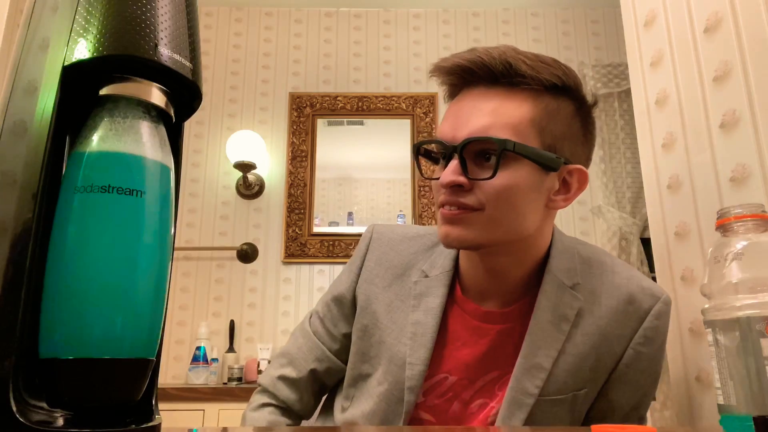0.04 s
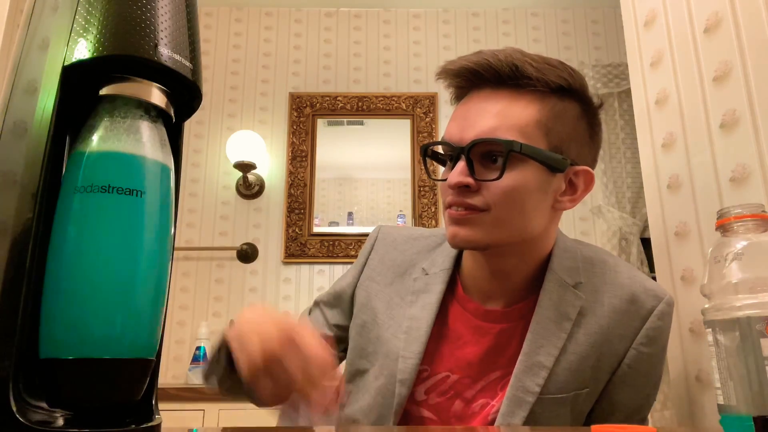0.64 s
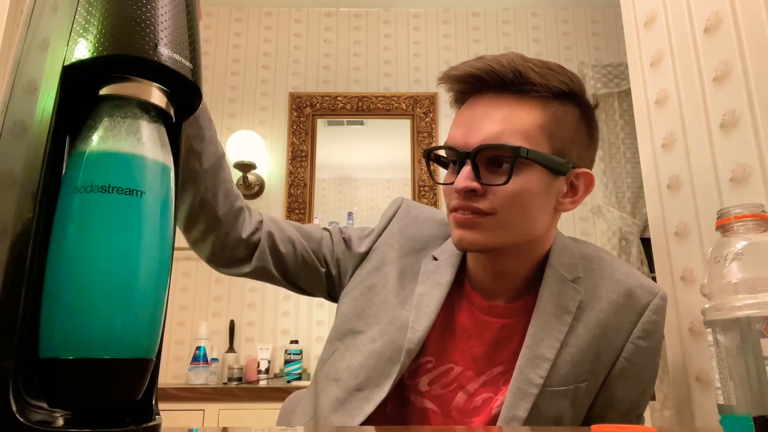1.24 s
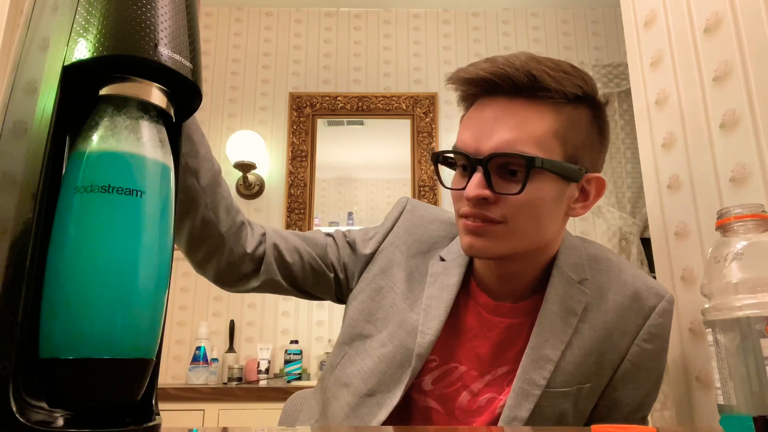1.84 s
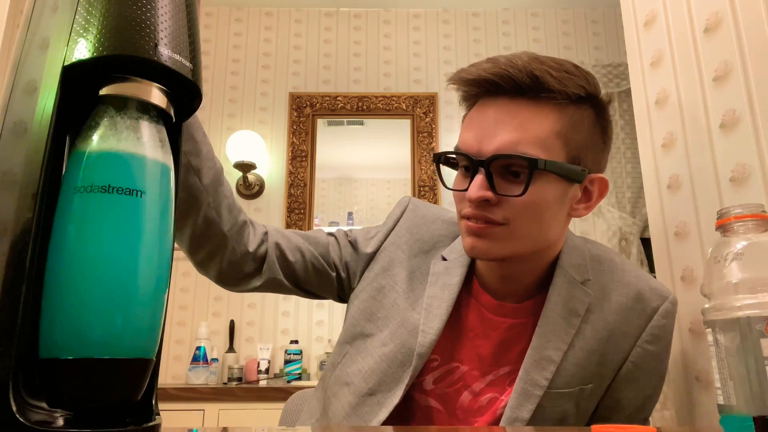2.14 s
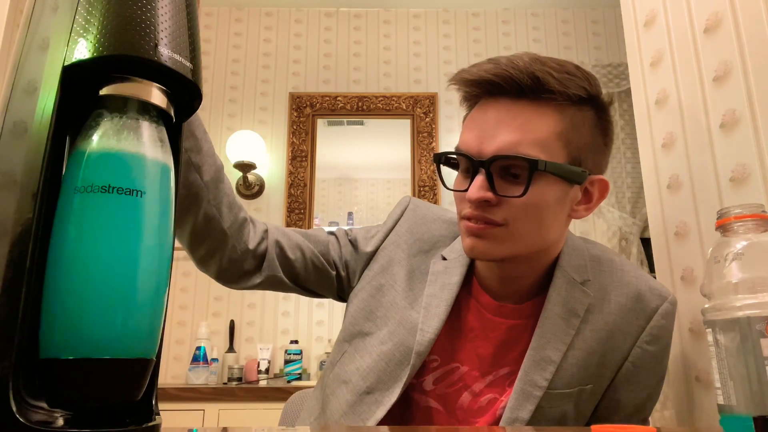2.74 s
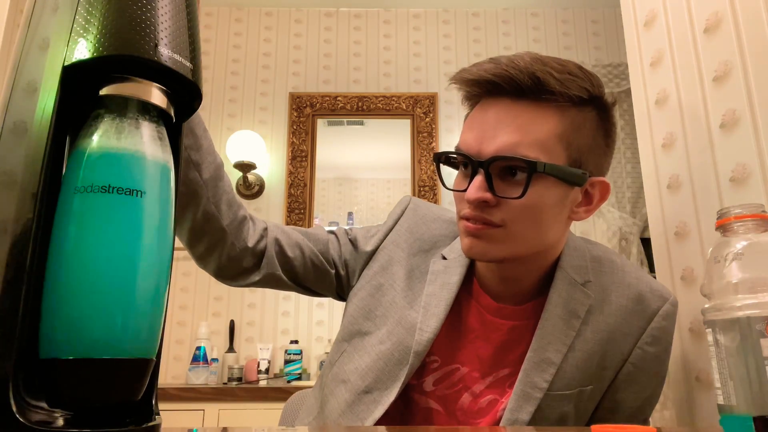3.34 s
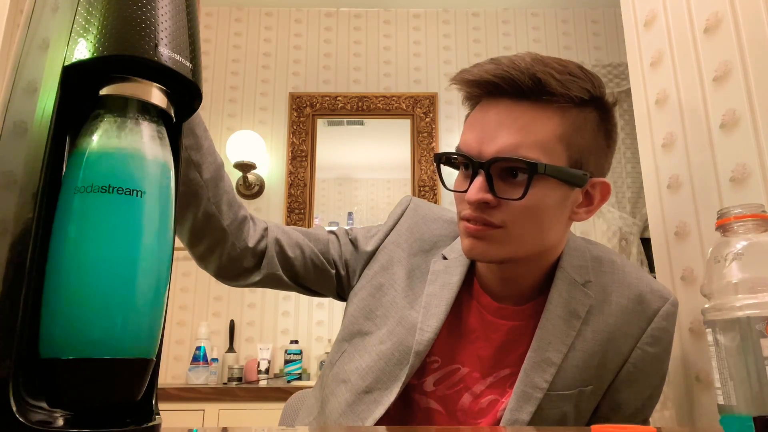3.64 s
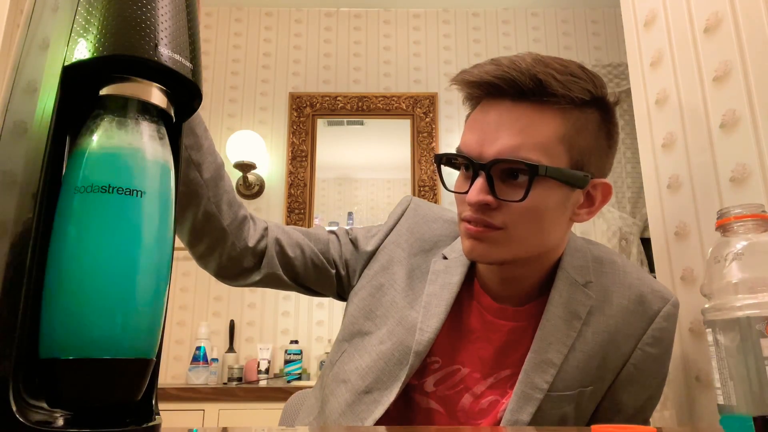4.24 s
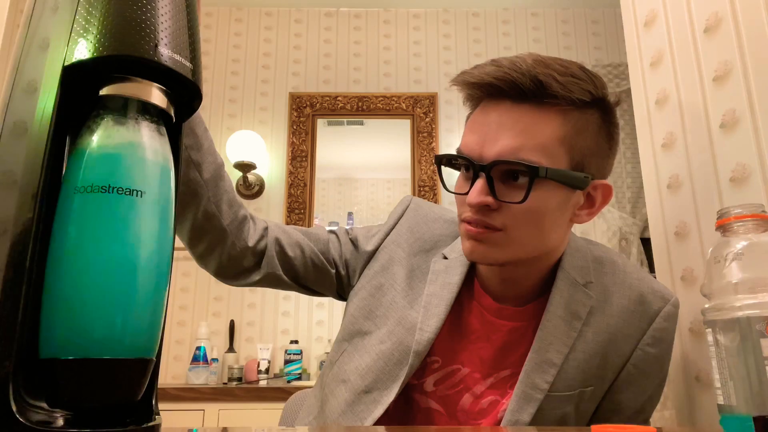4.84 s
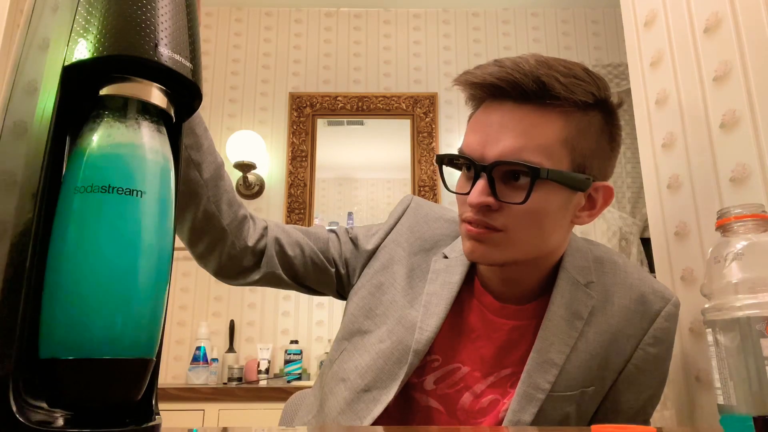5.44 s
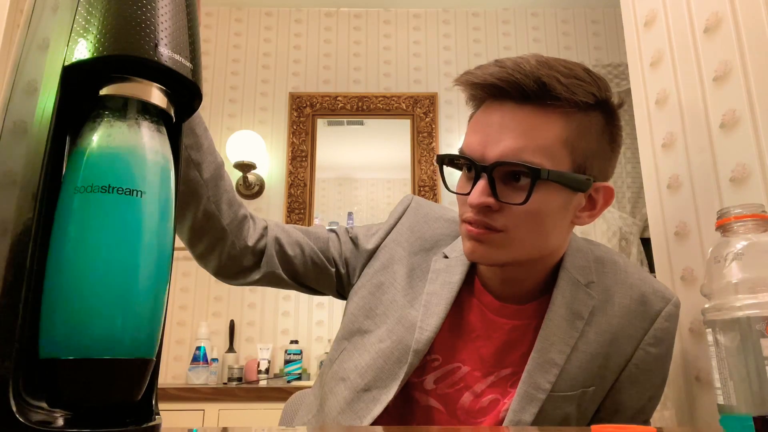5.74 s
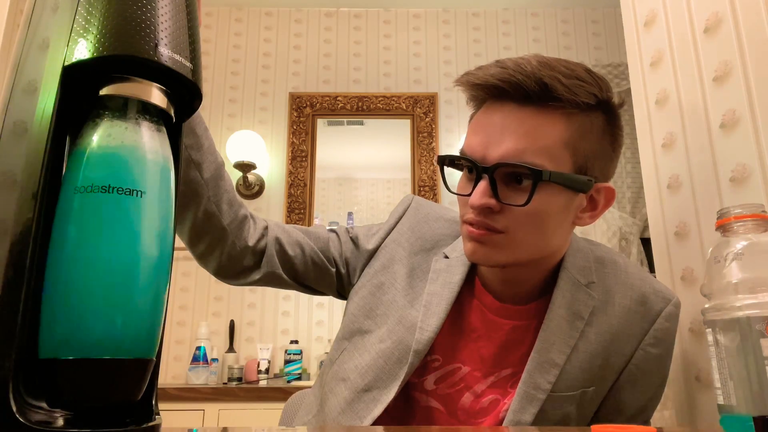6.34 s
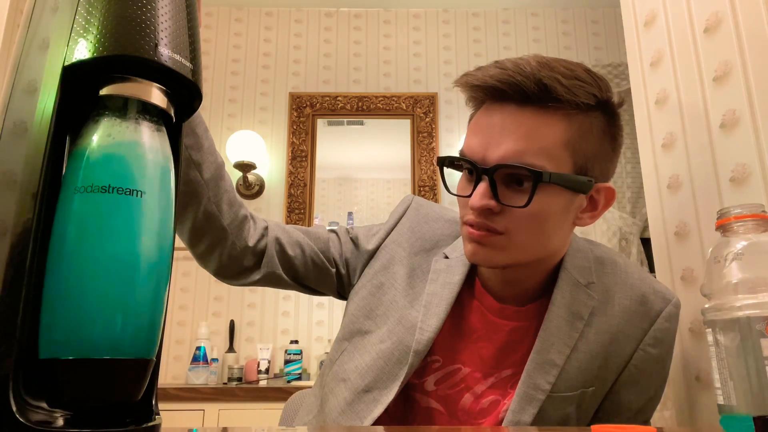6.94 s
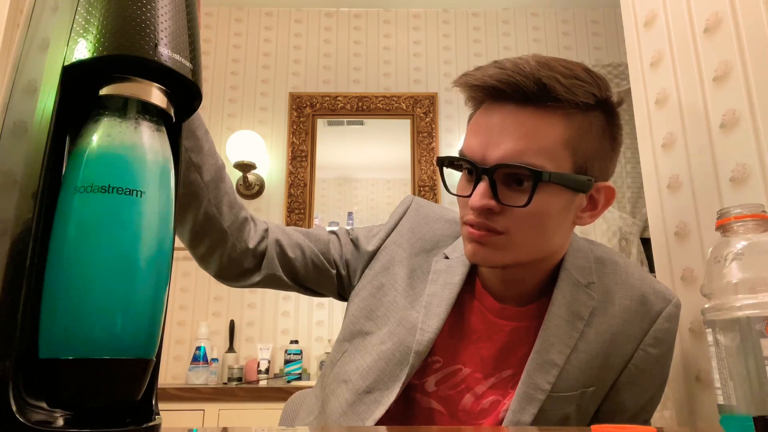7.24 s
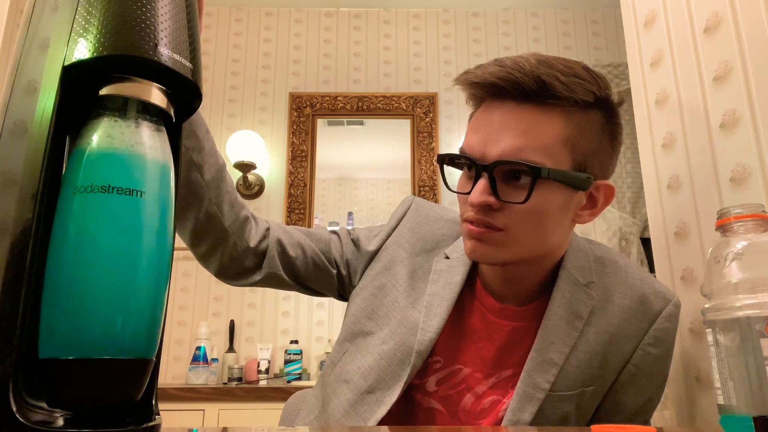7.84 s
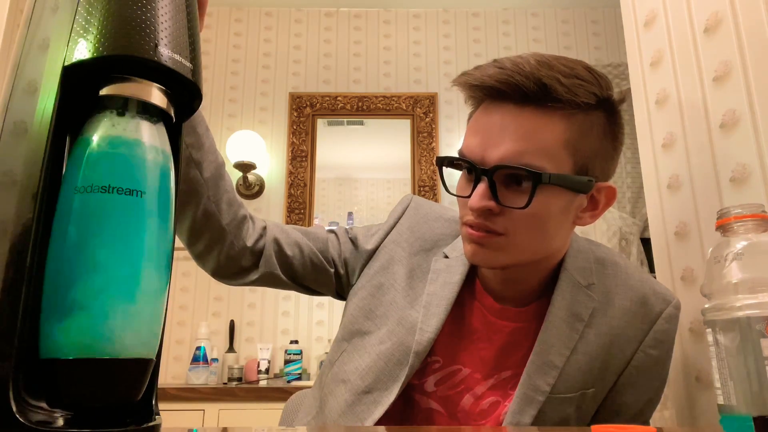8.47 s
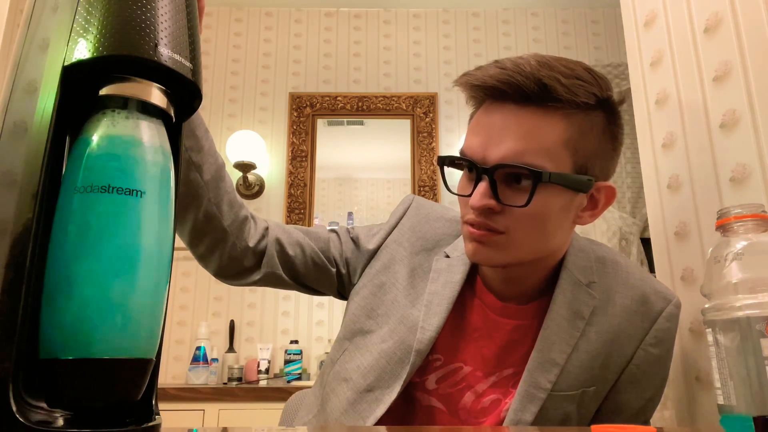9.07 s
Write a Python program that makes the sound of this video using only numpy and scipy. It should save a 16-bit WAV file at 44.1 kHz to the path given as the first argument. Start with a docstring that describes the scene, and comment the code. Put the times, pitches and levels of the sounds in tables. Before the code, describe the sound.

Plastic knocks and faint fizzing, then gas hisses and gurgles into a bottled drink in one long burst and one brief, louder one.

```python
"""Soda maker, two presses

A home soda maker on a counter in a small room, close to a microphone with two ports.
A hand lands on the lever and presses twice: a long, sputtering squeeze, then a short, hard blast.
The gas jet hisses, tears into bubbles and rings bottle and counter; the lever knocks as it moves."""
import sys
import numpy as np
from scipy import signal
from scipy.fft import rfft, irfft, next_fast_len
from scipy.io import wavfile
from scipy.ndimage import uniform_filter1d, map_coordinates

SR = 44100
rng = np.random.default_rng(int(sys.argv[2]) if len(sys.argv) > 2 else 0)


def dump_mix(stems):
    """Bounce the given channels to the path in sys.argv[1] as a 16-bit WAV at rate SR."""
    frames = np.atleast_2d(stems).T  # one column per channel
    limited = np.clip(frames, -1, 1)  # hard clip at full scale
    pcm = np.round(limited * 32767).astype(np.int16)
    wavfile.write(sys.argv[1], SR, pcm)


N = 406055
T = np.arange(N) / SR
HZ = np.fft.rfftfreq(2 ** 15, 1 / SR)

# presses of the lever: start_s, held_s, full_flow_db, first_flow_below_full_db, swell_s,
# sag_db_per_s, close_db_per_s, seep_after_db
PRESSES = [(2.794, 4.21, -16.5, 13, 1.93, 1.23, 240, -48), (7.868, 0.758, -10.5, 9, 0.26, 18.5, 185, -41.5)]
# modes of the counter: pitch_hz, level_db, t60_s
COUNTER = [(65.1, -8, 0.94), (81.8, 2.5, 0.49), (114.2, 3.5, 0.47), (137.4, 2.5, 0.34)]


def amp(db):
    """Decibels to gain."""
    return 10 ** (np.asarray(db) / 20)


def unit_rms(x):
    """Scales to an rms of one."""
    return x / np.sqrt(np.mean(x ** 2) + 1e-20)


def read(points, hz):
    """Reads rows of (frequency_hz, value) on a log-frequency axis."""
    f, value = np.transpose(points)
    return np.interp(np.log(hz + 1), np.log(f + 1), value)


def curves(rows, t):
    """The columns of rows (time_s, value, ...) at the times t."""
    s, *columns = np.transpose(rows)
    return [np.interp(t, s, c) for c in columns]


def add(mix, start_s, sound):
    """Adds a stereo sound to the mix."""
    part = mix[:, max(round(start_s * SR), 0):][:, :sound.shape[1]]
    part += sound[:, :part.shape[1]]


def wander(size, rate_hz):
    """Smooth random drift of rms one, mostly slower than rate_hz."""
    padded = next_fast_len(size)
    spectrum = rfft(rng.standard_normal(padded))
    hz = np.arange(len(spectrum)) * SR / padded
    return unit_rms(irfft(spectrum / (1 + (hz / rate_hz) ** 2), padded)[:size])


def colour(x, gain):
    """Filters by a gain given on the HZ axis."""
    size = next_fast_len(x.shape[-1] + 2048, real=True)
    hz = np.fft.rfftfreq(size, 1 / SR)
    gains = np.array([np.interp(hz, HZ, g) for g in np.atleast_2d(gain)])
    return irfft(rfft(x, size) * gains, size)[:, :x.shape[-1]]


def noise(size, gain):
    """Coloured noise of rms one, unrelated left and right."""
    return unit_rms(colour(rng.standard_normal((2, size)), gain))


def bell(hz, half_width_hz):
    """Shape of one resonance on the HZ axis."""
    return 1 / (1 + ((HZ - hz) / half_width_hz) ** 2)


def resonances(modes):
    """Left and right gain of a set of resonances."""
    return sum(amp([[db + pan / 2], [db - pan / 2]]) * bell(hz, width) for hz, width, db, pan in modes)


def patchy(x, depth_db, span_hz, span_s):
    """Turbulence: patches of the spectrum swell and fade on their own."""
    spectra = signal.stft(x, SR, nperseg=512)[2]
    field = rng.standard_normal(spectra.shape[1:])
    field = uniform_filter1d(field, max(round(span_hz * 512 / SR), 1), 0)
    field = uniform_filter1d(field, max(round(span_s * SR / 256), 1), 1)
    return signal.istft(spectra * amp(depth_db * unit_rms(field)), SR, nperseg=512)[1][:, :x.shape[1]]


def sloshing(x, share, rate_hz):
    """The drink heaves about, so resonances waver by this share of their pitch."""
    at = np.arange(x.shape[1]) + np.cumsum(share * wander(x.shape[1], rate_hz))
    return np.array([map_coordinates(port, [at], order=3, mode="mirror") for port in x])


def fizz(level_db=-31, hush_db_per_s=25, pops_per_s=160):
    """Tiny bubbles pop on the drink until pressure builds over it."""
    # spectrum of the fizz: frequency_hz, level_db
    spectrum = [(200, -32), (400, 5), (1050, 8), (2000, -4), (3000, -5), (3600, -2), (5500, -4.5),
                (8000, -6), (10000, -1.5), (15000, 1.5)]
    shape = amp(read(spectrum, HZ))
    bursts = (rng.random(N) < pops_per_s / SR) * amp(1.5 * np.minimum(rng.exponential(1, N), 4))
    energy = signal.lfilter([1], [1, -np.exp(-1 / (0.0069 * SR))], bursts ** 2)  # lingers in the bottle
    crackle = unit_rms(noise(N, shape * HZ / np.hypot(HZ, 7000)) * np.sqrt(energy))
    hush_db = hush_db_per_s * np.maximum(T - PRESSES[0][0], 0)
    return amp(level_db - hush_db) * (0.25 * noise(N, shape) + amp(-4) * crackle)


def room_air(level_db=-42):
    """Still air of the room, wavering slightly in level."""
    # room tone: frequency_hz, level_db
    spectrum = [(20, -29), (50, 7), (85, 11.5), (125, 6.5), (200, -3.5), (350, -8.5), (700, -17),
                (1100, -35), (2200, -13.5), (3000, -22.5), (6000, -18.5), (15000, -15.5)]
    return amp(level_db + wander(N, 9.8)) * noise(N, amp(read(spectrum, HZ)))


def seep(rest_db=-50):
    """Gas seeps through the seal, harder after each press."""
    # thin whistles of the seal: pitch_hz, half_width_hz, level_db, left_minus_right_db
    whistles = [(1045, 70, 4, 4), (1645, 174, 11.5, -3.5), (5060, 350, 8.5, -1), (8300, 110, -1, 25),
                (12060, 360, 0.5, 9)]
    level_db = np.full(N, rest_db)
    for start, held, *_, after_db in PRESSES:
        level_db = level_db + (after_db - level_db) * np.clip((T - start) / held, 0, 1)
    return amp(level_db) * noise(N, resonances(whistles))


def struck(modes, t, rise_s, detune):
    """Dying modes; the hand's load shifts their pitch and phase from blow to blow."""
    phases = rng.random((len(modes), 2, 1))
    shifts = 1 + detune * rng.uniform(-1.12, 1, len(modes))
    ringing = sum(amp(db - 60 * t / t60) * np.sin(2 * np.pi * (hz * shift * t + phase))
                  for (hz, db, t60), phase, shift in zip(modes, phases, shifts))
    return ringing * (1 - np.exp(-t / rise_s))


def knock(boom_db, ring_db, click_db, hardness):
    """A blow booms in the counter, rattles the casing and clicks; levels are rms over the first 40 ms."""
    # modes of the casing: pitch_hz, level_db, t60_s
    casing = [(202.3, -9, 0.46), (242.4, 3.5, 0.19), (380.3, 1, 0.26), (474, -9, 0.067), (749, 0, 0.12),
              (928, 1, 0.15), (1046, -1, 0.09), (1597, -19, 0.23)]
    # click of hard plastic: frequency_hz, level_db
    plastic = [(200, 22), (600, 8), (950, 16.5), (1400, 11.5), (2400, 15.5), (4000, 9.5), (7000, 3),
               (16000, -11)]
    t = np.arange(int(.6 * SR)) / SR
    boom = struck(COUNTER, t, rise_s=0.004, detune=0.063)
    tilt = amp(hardness * np.log2((HZ + 150) / 650))
    rattle = noise(len(t), bell(170, 780) ** 2 * HZ / np.hypot(HZ, 200) * tilt)
    rattle *= (amp(-60 * t / 0.15) + 0.63 * amp(-60 * t / .5)) * (1 - np.exp(-t / 0.00071))
    modes = [(hz, db + hardness * np.log2(hz / 500), t60) for hz, db, t60 in casing]
    ring = struck(modes, t, rise_s=0.00059, detune=0.015) + 0.97 * rattle
    click_decay = amp(-60 * t / 0.086) + 0.2 * amp(-60 * t / 0.41)
    click = noise(len(t), amp(read(plastic, HZ))) * click_decay * np.clip((t - .001) / 0.0017, 0, 1)
    layers = (boom, boom_db), (ring, ring_db), (click, click_db)
    return sum(amp(db) * x / np.sqrt(np.mean(x[:, t < .04] ** 2, axis=1, keepdims=True))
               for x, db in layers)


def pop(level_db):
    """A single bubble bursts on the drink with a bright tick."""
    t = np.arange(SR // 20) / SR
    return amp(level_db - 60 * t / 0.087) * noise(len(t), bell(10400, 1800))


def valve(start_s, held_s, full_db, below_db, swell_s, sag_db_per_s, close_db_per_s, open_s=0.028):
    """The valve cracks open, eases up to full flow, sags and shuts: times, flow in dB, opening gain."""
    age = np.arange(0, held_s + 40 / close_db_per_s, 1 / SR)
    flow_db = full_db - below_db * np.maximum(1 - age / swell_s, 0) ** 2
    flow_db -= sag_db_per_s * np.maximum(age - swell_s, 0)
    opening = np.minimum(age / open_s, 1) * amp(-close_db_per_s * np.maximum(age - held_s, 0))
    return start_s + age, flow_db, opening


def spurts(t):
    """The gas swells and falters in smooth arches: the change of flow and of rumble in dB."""
    # swells and falters: middle_s, length_s, flow_change_db, rumble_change_db
    arches = [(2.845, 0.13, 9, -6), (3.002, 0.25, 8.5, -2), (3.203, 0.11, -5, 2), (3.448, 0.22, 5.5, -2),
              (3.657, 0.076, -5.5, 1), (3.835, 0.13, -2.5, -5), (4.26, 0.45, -1, 7.5), (5.0, 0.39, 1, -1),
              (5.46, 0.22, 2, -5), (5.623, 0.066, -4, -1), (5.842, 0.025, -6, 6), (6.143, 0.34, 0.5, 6.5),
              (6.316, 0.12, -0.5, -5), (6.51, 0.17, 2, -1), (6.88, 0.29, 3.5, 4), (8.633, 0.23, 3.5, -5)]
    lift = np.zeros((2, len(t)))
    for middle, length, flow_db, rumble_db in arches:
        arch = np.cos(np.pi * np.clip((t - middle) / length, -.5, .5))
        lift += np.outer([flow_db, rumble_db], arch)
    return lift


def bubbles(pitch_hz, per_s, octaves, cycles, size_db):
    """Newborn bubbles: short pings that rise a little, scattered round a moving pitch."""
    size = len(pitch_hz)
    births = np.flatnonzero(rng.random(size) < per_s / SR)
    spread, strength, *phases = rng.random((len(births), 4)).T
    scatter = np.log((spread + 1e-3) / (1.001 - spread)) / 2
    hz = (pitch_hz[births] * 2 ** (octaves * scatter))[:, None]
    t = np.arange(0, 4 * cycles / np.mean(pitch_hz), 1 / SR)
    age = hz * t / cycles
    gain = amp(-size_db * np.log(strength + 0.051))[:, None]
    envelope = gain * np.exp(-age) * (1 - np.exp(-2 * hz * t))
    pings = [envelope * np.sin(2 * np.pi * (hz * t * (1 + 0.0102 * age) + p[:, None])) for p in phases]
    where = (births[:, None] + np.arange(len(t))).ravel()
    return unit_rms(np.array([np.bincount(where, side.ravel(), size)[:size] for side in pings]))


def jet(flow_db, stir_db, pitch_hz, surge,
        spectrum, hiss_db, spray_db, froth_db, chirp_db, surge_db, housing_depth):
    """Gas hisses from the nozzle, tears into bubbles and throws fine spray, coloured by the housing."""
    # resonances of nozzle and housing: pitch_hz, half_width_hz, nominal_lift_db
    housing_modes = [(1678, 13.4, 11.5), (1886, 180, 3.5), (2323, 20, 7.5), (2703, 19, 9.5),
                     (2775, 8.3, 5.5), (3415, 150, 6), (3717, 25, 9), (4085, 17, 11), (4940, 13, 8.5)]
    size = len(flow_db)
    housing = amp(housing_depth * sum(db * bell(hz, width) for hz, width, db in housing_modes))
    shape = amp(read(spectrum, HZ)) * housing * (HZ / np.hypot(HZ, 130)) ** 2
    fine = 1 / (1 + (7500 / (HZ + 1)) ** 6)  # share of the hiss that is fine spray
    thin = 1 / (1 + (4300 / (HZ + 1)) ** 10)  # share above the nozzle's main hump
    smaller = np.log2(pitch_hz / 3300)  # as pressure climbs the bubbles shrink and the hiss thins
    body = sloshing(noise(size, shape * np.sqrt(1 - thin)), share=.007, rate_hz=4)
    body *= amp(-5 * np.maximum(smaller, 0))
    edge = amp(4.8 * smaller + 0.5) * noise(size, shape * np.sqrt(thin * (1 - fine)))
    # swarms of like-sized bubbles light up narrow bands for a moment
    swarm = dict(span_hz=170, span_s=.018)
    hiss = amp(hiss_db) * (patchy(body, depth_db=3.4, **swarm) + patchy(edge, depth_db=1.7, **swarm))
    mist = noise(size, shape * np.sqrt(fine))
    mist *= amp(spray_db + flow_db + stir_db + 1.12 * surge_db * surge)
    pitch_hz = pitch_hz * 2 ** (0.0633 * wander(size, 28.6))
    # crowded bubbles damp each other; lone ones ring longer
    froth = bubbles(pitch_hz, per_s=1600, octaves=0.294, cycles=2.5, size_db=1)
    chirps = bubbles(pitch_hz, per_s=230, octaves=.27, cycles=52, size_db=2)
    gurgle = colour(amp(froth_db) * froth + amp(chirp_db - smaller) * chirps, housing)
    stream = (hiss + gurgle) * amp(flow_db + surge_db * surge)
    return patchy(stream + mist, depth_db=1.4, span_hz=700, span_s=.017)


def bottle_ring(t, level_db, stir_up_s=0.069):
    """The filled bottle burbles once the drink starts churning."""
    # resonances of the bottle: pitch_hz, half_width_hz, level_db, left_minus_right_db
    modes = [(258, 17, 2.5, -3), (392.3, 22.7, 6.5, 1.5), (518, 25, -2.5, -10.5), (688, 23.4, -0.5, 1)]
    ring = sloshing(noise(len(t), resonances(modes)), share=0.0244, rate_hz=8.05)
    burble = patchy(ring, depth_db=1.5, span_hz=350, span_s=.04)
    return amp(level_db) * burble * np.minimum((t - t[0]) / stir_up_s, 1)


def neck_ring(t, level_db, modes):
    """The gas space in the bottle's neck rings, wavering as the drink heaves."""
    ring = sloshing(noise(len(t), resonances(modes)), share=.014, rate_hz=8.2)
    return amp(level_db) * patchy(ring, depth_db=1.5, span_hz=170, span_s=.025)


def counter_rumble(t, level_db):
    """The shaken counter rumbles at its modes."""
    return amp(level_db) * noise(len(t), sum(amp(db) * bell(hz, 6.5) for hz, db, _ in COUNTER))


def press(row, breakup, neck_levels, neck_modes,
          bottle_db, neck_db, rumble_db, follow, damp_db_per_s, **nozzle):
    """One press: the jet sounds and shakes bottle, neck and counter. Gives start time and sound."""
    t, flow_db, opening = valve(*row[:-1])
    spurt_db, heave_db = spurts(t)
    flow_db = flow_db + spurt_db
    stir_db, pitch_hz = curves(breakup, t)
    full_db = row[2]
    churn_db = 0.35 * (stir_db - stir_db.mean())
    shake_db = follow * (flow_db - full_db) + churn_db - damp_db_per_s * (t - t[0])
    surge = wander(len(t), 45)  # the gas leaves the nozzle unevenly
    gas = jet(flow_db, stir_db, pitch_hz, surge, **nozzle)
    bottle = bottle_ring(t, bottle_db + shake_db + 0.36 * heave_db + 0.51 * surge)
    neck = neck_ring(t, neck_db + curves(neck_levels, t)[0], neck_modes)
    counter = counter_rumble(t, rumble_db + 0.49 * shake_db + heave_db)
    return t[0], (gas + bottle + neck + counter) * opening


def squeeze(neck_modes):
    """The valve part open: a long, sputtering jet full of bubbles."""
    # hiss of the jet: frequency_hz, level_db
    spectrum = [(200, -3), (500, -13), (800, -16), (1300, -1), (1800, 0.5), (2600, 8), (3500, 2),
                (4900, 6.5), (6200, 3), (8200, 6), (10500, -0.5), (13500, -2), (15300, -44)]
    # break-up of the jet: time_s, relative_spray_db, bubble_pitch_hz
    breakup = [(2.82, -10.5, 2580), (3.0, -6.5, 2750), (3.249, -17, 2333), (3.48, -18.5, 4110),
               (3.66, -15, 2900), (4.35, -8.5, 3590), (5.1, -19, 3340), (5.6, -18.5, 3174),
               (6.08, -12.5, 3490), (6.45, -14.5, 5000), (6.821, -22, 4950), (7.0, -24, 3550)]
    # ring of the neck: time_s, relative_level_db
    neck_levels = [(2.85, -31), (3.05, -27), (3.17, -34.5), (4.3, -30), (4.661, -36), (5.1, -33.5),
                   (7.0, -36.5)]
    return press(PRESSES[0], breakup, neck_levels, neck_modes,
                 bottle_db=-34, neck_db=-0.5, rumble_db=-35, follow=0.23, damp_db_per_s=-0.43,
                 spectrum=spectrum, hiss_db=-7.8, spray_db=4.5, froth_db=-12.5, chirp_db=-11.3,
                 surge_db=1.39, housing_depth=1.01)


def in_room(x, wet_db, tail_s=0.17):
    """Adds the small room's diffuse reflections, each band dying at its own speed."""
    # decay of the room: frequency_hz, t60_s
    decay = [(80, .7), (210, .5), (560, 0.58), (1470, 0.14), (4000, 0.41), (14000, 0.068)]
    hz, t, spectra = signal.stft(rng.standard_normal((2, int(tail_s * SR))), SR, nperseg=256)
    tail = signal.istft(spectra * amp(-60 * t / read(decay, hz)[:, None]), SR, nperseg=256)[1]
    tail /= np.linalg.norm(tail, axis=1, keepdims=True)
    return x + amp(wet_db) * signal.fftconvolve(x, tail, axes=1)[:, :x.shape[1]]


def gulp(length_s, level_db, pitch_hz):
    """A pocket of gas breaks up into a cloud of bubbles of like size."""
    size = int((length_s + 0.0028) * SR)
    cloud = bubbles(np.full(size, pitch_hz), per_s=2000, octaves=0.13, cycles=11, size_db=2)
    cloud *= signal.windows.tukey(size, .2)
    return amp(level_db) * in_room(np.pad(cloud, ((0, 0), (0, SR // 5))), wet_db=-8)


def throb(level_db, neck_mode, length_s=.065):
    """A big bubble breaks the surface and sounds the gas in the neck for a moment."""
    hz, _, _, pan_db = neck_mode
    t = np.arange(0, length_s, 1 / SR)
    turns = np.cumsum(hz * (1 + 0.014 * wander(len(t), 16))) / SR + rng.random((2, 1))
    swell = np.sin(np.pi * t / length_s) ** 2
    return amp([[level_db], [level_db - pan_db]]) * swell * np.sin(2 * np.pi * turns)


def blast(neck_modes):
    """The valve wide open: a short jet that shakes the bottle hard, less as pressure builds."""
    # hiss of the jet: frequency_hz, level_db
    spectrum = [(200, 8.5), (500, -11), (800, -2), (1300, 3.5), (1900, -4.5), (2700, 5), (3500, 3),
                (4900, 1), (6200, 0.5), (8200, 1.5), (10500, -3.5), (13500, -3.5), (15300, -34)]
    # break-up of the jet: time_s, relative_spray_db, bubble_pitch_hz
    breakup = [(7.88, -11.5, 3360), (8.202, -17, 3780), (8.5, -15, 4420), (8.7, -24.5, 3800)]
    # ring of the neck: time_s, relative_level_db
    neck_levels = [(7.89, -30), (7.94, -24), (8.184, -23), (8.58, -37)]
    return press(PRESSES[1], breakup, neck_levels, neck_modes,
                 bottle_db=-19.5, neck_db=-1, rumble_db=-25, follow=0.99, damp_db_per_s=10,
                 spectrum=spectrum, hiss_db=-8, spray_db=8.5, froth_db=-23, chirp_db=-17.5,
                 surge_db=0.8, housing_depth=1.1)


def stereo_image(x):
    """Left and right, from two ports a few centimetres apart, the left one nearer the machine."""
    # likeness of left and right, frequency by frequency: frequency_hz, coherence
    likeness = [(110, .95), (280, .6), (600, .4), (1100, .65), (3000, .45), (6000, .25), (9000, .88),
                (15000, .92)]
    # phase between the ports: frequency_hz, left_lead_rad
    lead = [(100, 0), (380, .2), (600, 1.5), (1030, .5), (1500, 1.4), (2600, -.5), (3400, 1.3), (4100, .3),
            (7000, 1), (9000, 3.1), (11500, 6.1), (12900, 6.6), (13800, 9.4)]
    # balance of the ports: frequency_hz, left_minus_right_db
    balance = [(60, 1), (200, 1.5), (600, 2.5), (2200, 5), (4000, 0)]
    size = next_fast_len(N + SR // 10, real=True)
    hz = np.fft.rfftfreq(size, 1 / SR)
    left, other = rfft(x, size)
    same = np.clip(read(likeness, hz), 0, 1)
    lean = amp(read(balance, hz) / 2)
    right = (same * left + np.sqrt(1 - same ** 2) * other) * np.exp(-1j * read(lead, hz))
    return irfft(np.array([left * lean, right / lean]), size)[:, :N]


def scene():
    """Both presses, their bubbles, knocks and thuds over the quiet room."""
    # knocks of hand and lever, and low thuds of the jet during the blast:
    # start_s, boom_db, ring_db, click_db, hardness_db_per_octave
    knocks_and_thuds = [(0.481, -33.5, -52, -75, -4), (0.765, -29.5, -44, -75, 4),
                        (0.914, -27, -25, -64, -9), (0.944, -19, -10.5, -16, 7.5),
                        (1.017, -22, -32, -55, 0), (1.153, -31.5, -32, -62.5, -6.5),
                        (1.235, -30, -39.5, -70, 0.5), (1.325, -30, -43.5, -71, -11),
                        (1.609, -48, -38, -55, 4), (1.982, -24, -28, -61, -4),
                        (2.353, -23, -33.5, -65, -2.5), (2.455, -41, -42, -72, -2),
                        (3.36, -30.5, -26.5, -50, 4.5), (4.865, -29, -31, -55, -1),
                        (7.075, -29, -22.5, -42, -0.5), (7.165, -17, -22.5, -20, -2.5),
                        (7.659, -40, -41, -72, -1), (7.705, -31, -28.5, -68, 2),
                        (7.744, -26, -32, -60, 2.5), (7.812, -37, -29.5, -49, 6),
                        (7.844, -16.5, -27, -46, -5), (8.079, -17.5, -20.5, -59, -16),
                        (8.128, -19, -25, -46, -2), (8.595, -15, -27, -49, -18),
                        (8.634, -25, -17.5, -44, -4.5), (8.687, -22.5, -24.5, -29.5, -3.5)]
    # single bubbles bursting on the drink: start_s, level_db
    pops = [(1.613, -27.5), (1.817, -29)]
    # resonances of the gas in the neck: pitch_hz, half_width_hz, level_db, left_minus_right_db
    neck_modes = [(899, 89, -1, 8), (1052.8, 26, 5.5, 8.5)]
    # big gulps of gas: start_s, length_s, level_db, pitch_hz
    gulps = [(2.805, 0.043, -22, 1735), (3.04, 0.038, -27, 2680), (3.21, 0.013, -27, 2360),
             (3.252, 0.013, -29, 2310), (3.285, 0.016, -33, 1680), (3.566, 0.022, -22, 2810),
             (3.628, 0.013, -20, 2520), (3.695, 0.084, -22, 1926), (3.878, 0.0081, -26, 1970),
             (5.42, 0.062, -25.5, 2040), (5.905, 0.024, -23, 3800), (6.755, 0.035, -21, 4750),
             (6.82, 0.016, -20, 3630), (8.57, 0.043, -19, 3680)]
    # big bubbles surfacing: start_s, level_db
    throbs = [(2.995, -18.5), (3.05, -23), (4.08, -30), (4.15, -31), (4.73, -21.5), (4.935, -19.5),
              (5.0, -21), (5.19, -22.5), (5.385, -23.5)]
    mix = fizz() + room_air() + seep()
    add(mix, *squeeze(neck_modes))
    add(mix, *blast(neck_modes))
    for start_s, *cloud in gulps:
        add(mix, start_s, gulp(*cloud))
    for start_s, level_db in throbs:
        add(mix, start_s, throb(level_db, neck_modes[-1]))
    for start_s, *blow in knocks_and_thuds:
        add(mix, start_s, knock(*blow))
    for start_s, level_db in pops:
        add(mix, start_s, pop(level_db))
    return stereo_image(mix)


def record(dry):
    """The microphone sheds the deepest bass, clips at full scale and cuts the highest treble."""
    thinned = signal.lfilter(*signal.butter(2, 28, "highpass", fs=SR), dry)
    lowpass = signal.firwin(511, 15750, window=("kaiser", 9), fs=SR)
    return signal.oaconvolve(np.clip(thinned, -1, 1), lowpass[None], "same", axes=1)


dry = scene()
out = record(dry)
dump_mix(out)
```